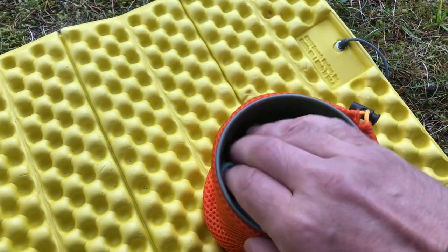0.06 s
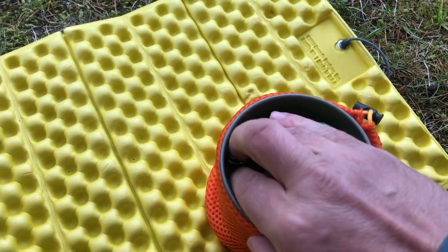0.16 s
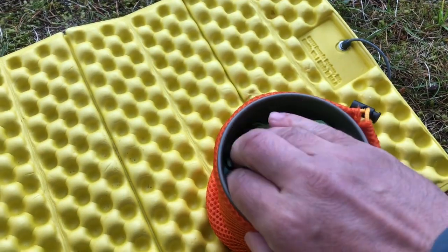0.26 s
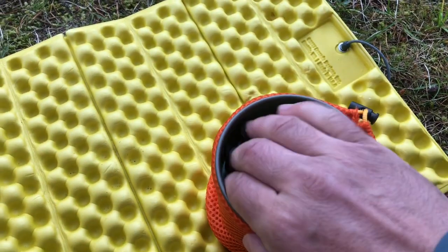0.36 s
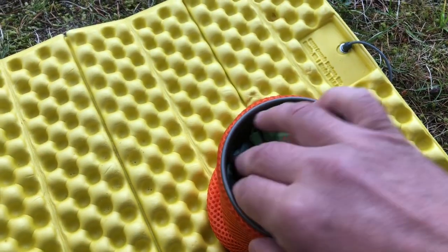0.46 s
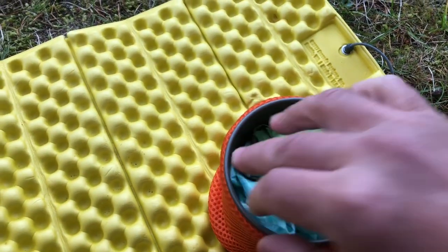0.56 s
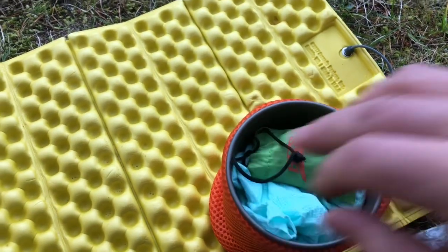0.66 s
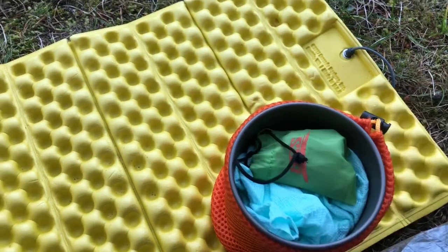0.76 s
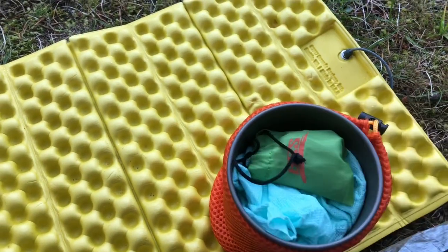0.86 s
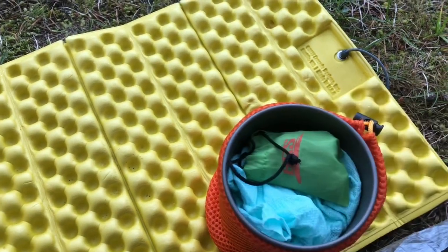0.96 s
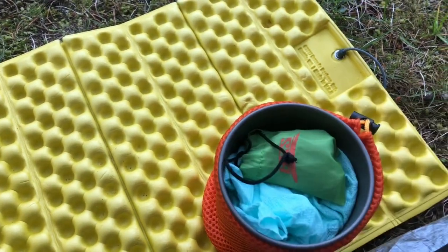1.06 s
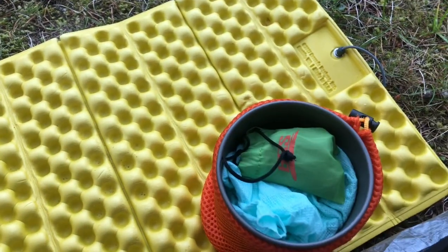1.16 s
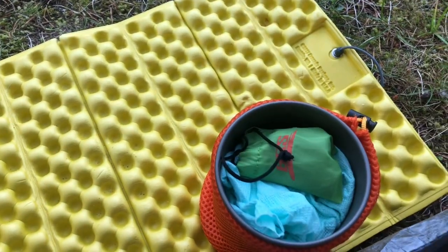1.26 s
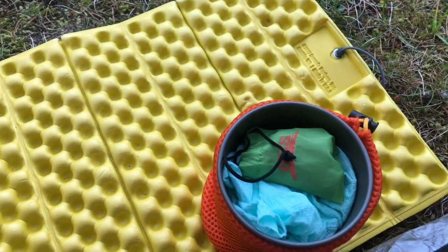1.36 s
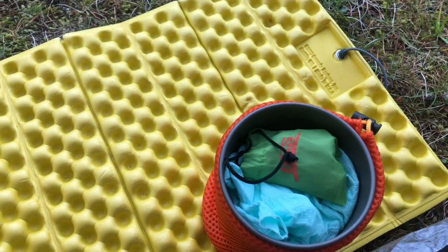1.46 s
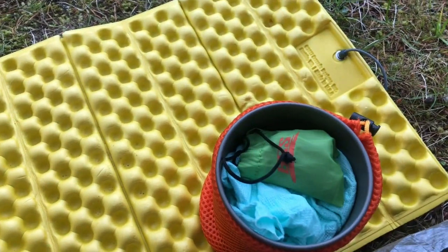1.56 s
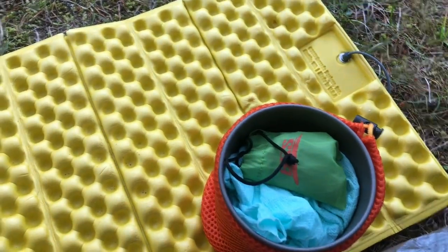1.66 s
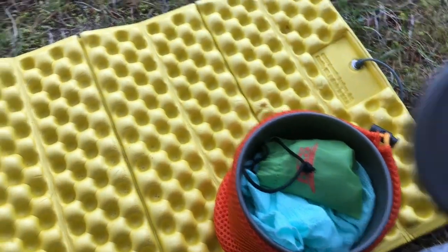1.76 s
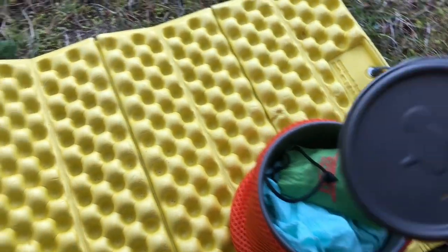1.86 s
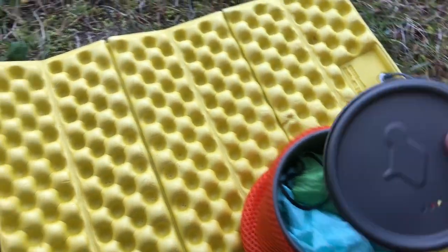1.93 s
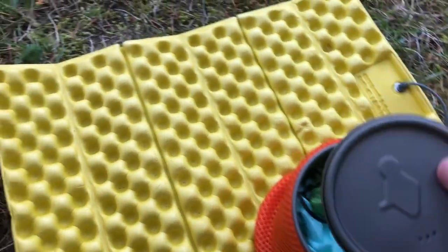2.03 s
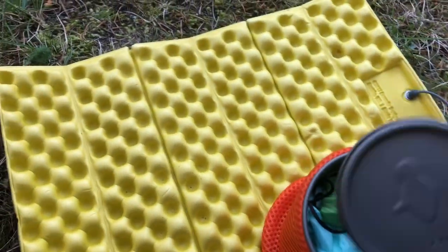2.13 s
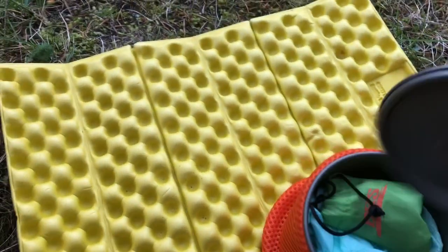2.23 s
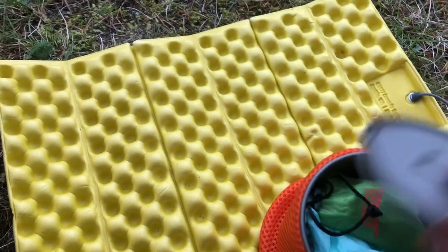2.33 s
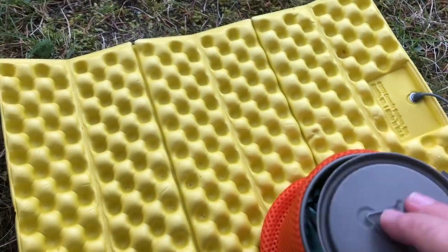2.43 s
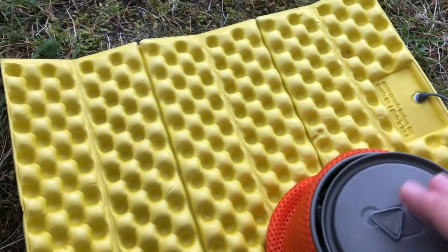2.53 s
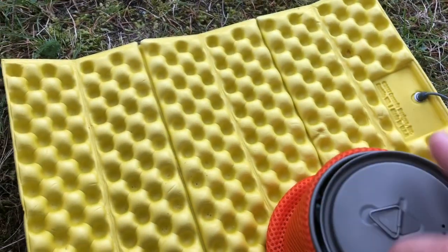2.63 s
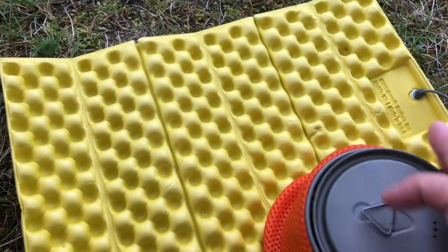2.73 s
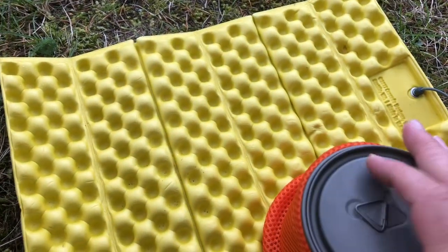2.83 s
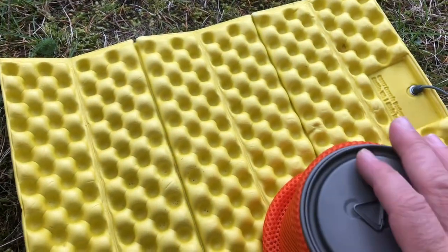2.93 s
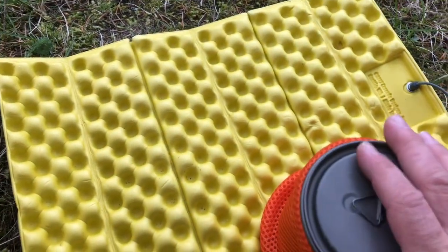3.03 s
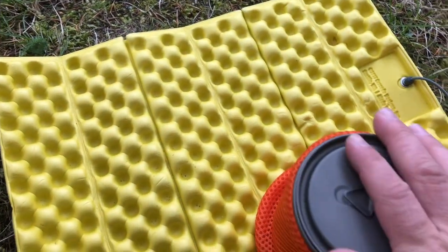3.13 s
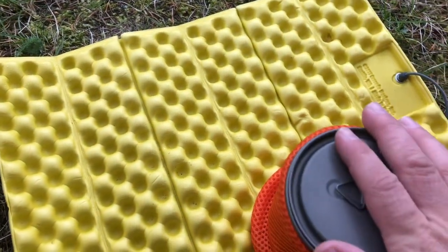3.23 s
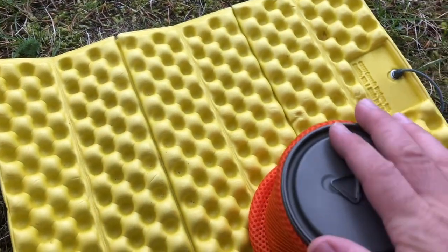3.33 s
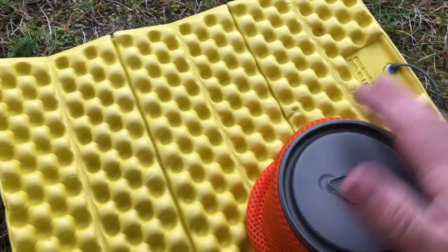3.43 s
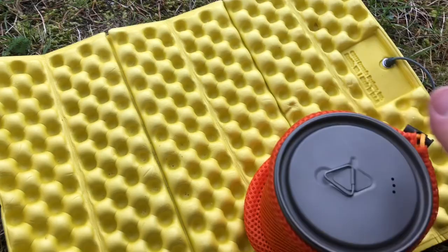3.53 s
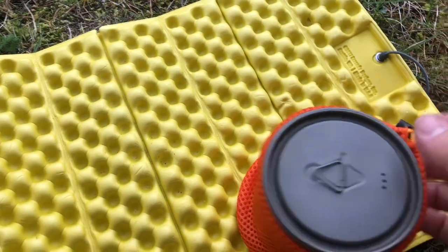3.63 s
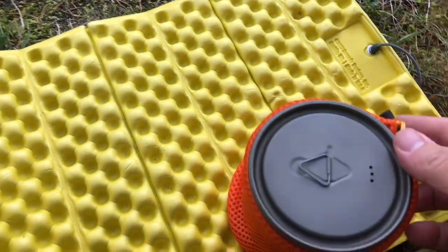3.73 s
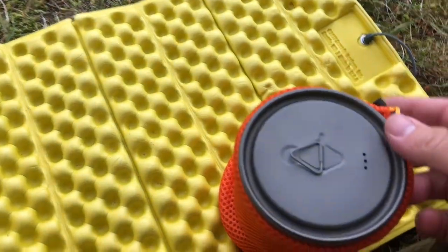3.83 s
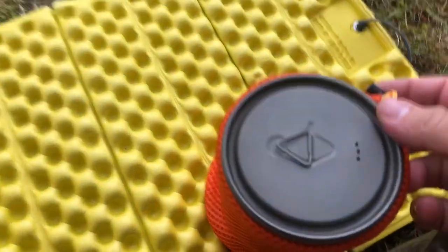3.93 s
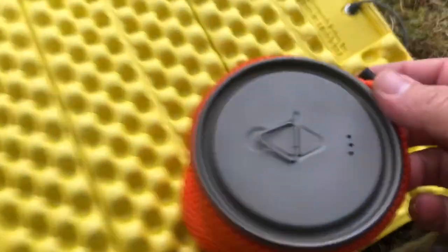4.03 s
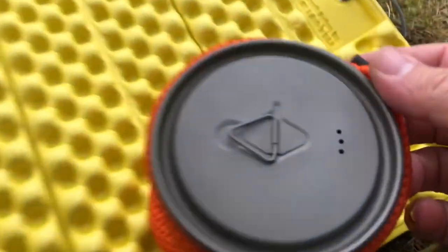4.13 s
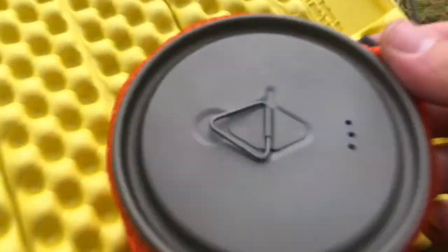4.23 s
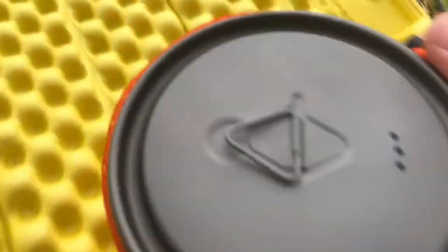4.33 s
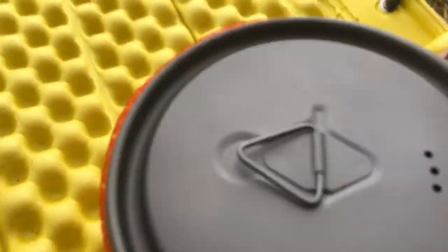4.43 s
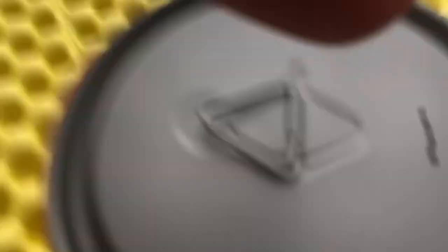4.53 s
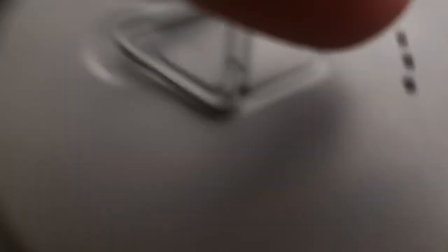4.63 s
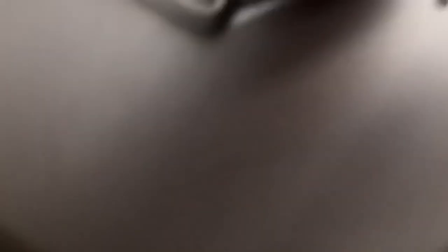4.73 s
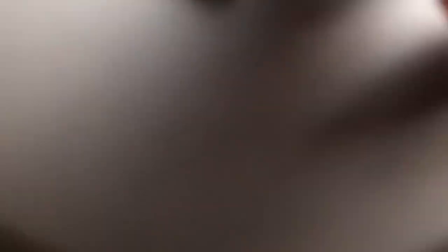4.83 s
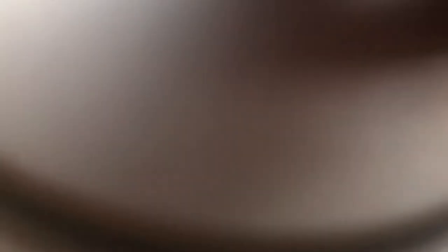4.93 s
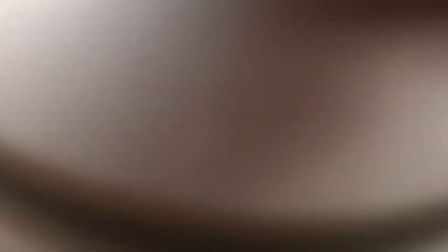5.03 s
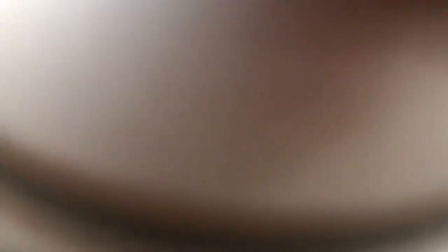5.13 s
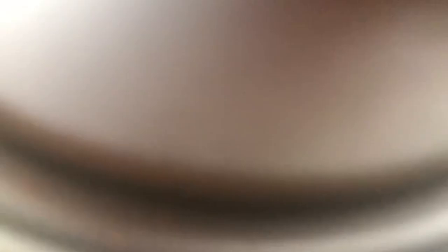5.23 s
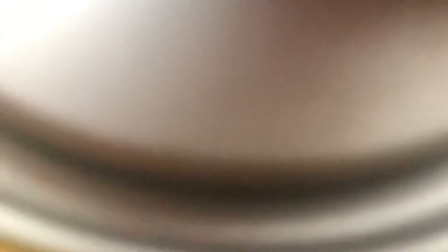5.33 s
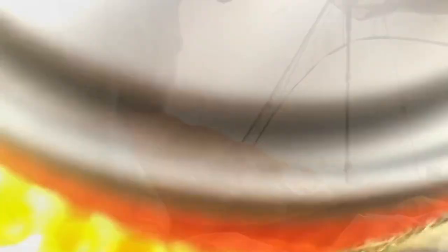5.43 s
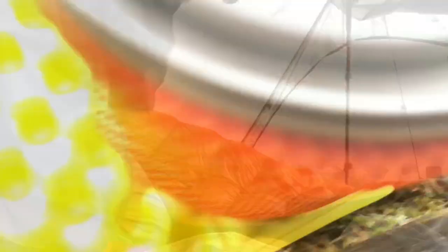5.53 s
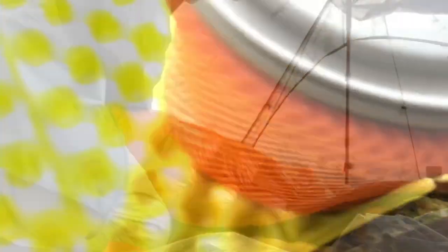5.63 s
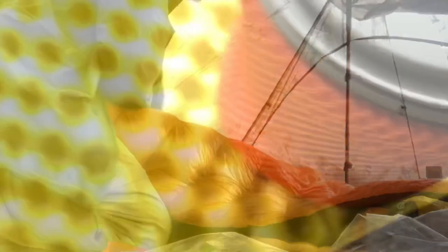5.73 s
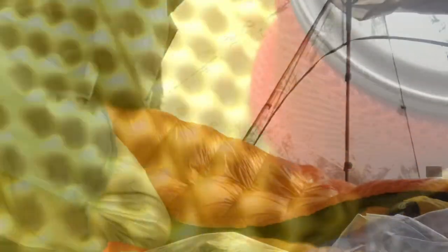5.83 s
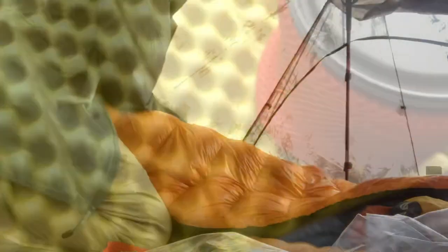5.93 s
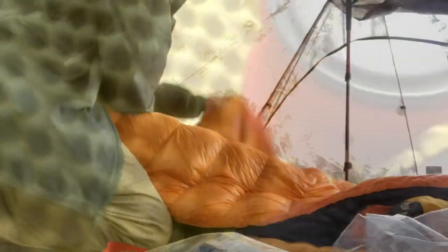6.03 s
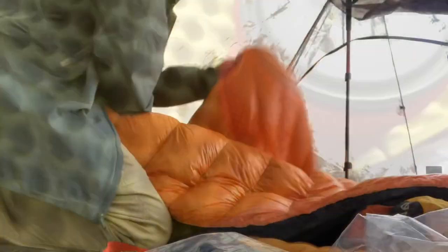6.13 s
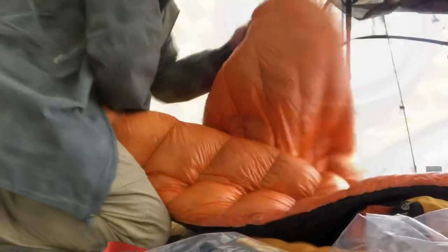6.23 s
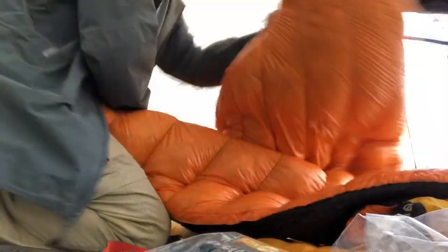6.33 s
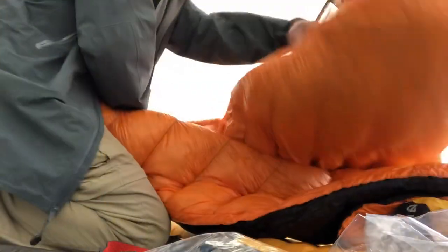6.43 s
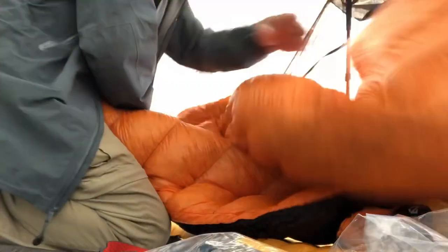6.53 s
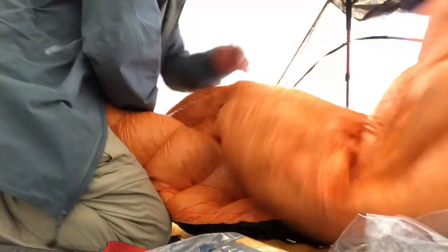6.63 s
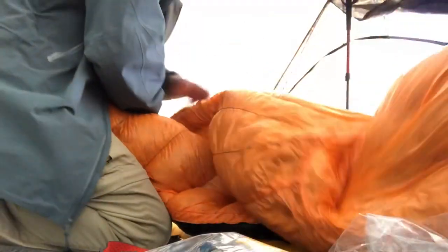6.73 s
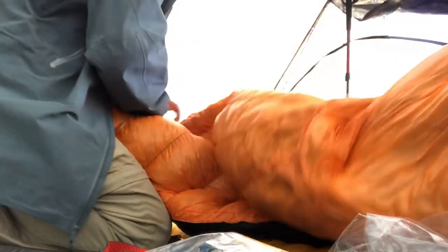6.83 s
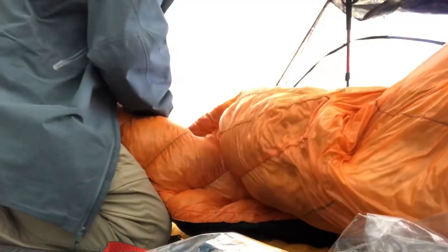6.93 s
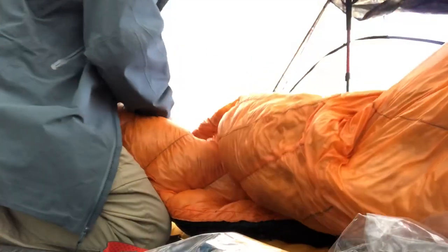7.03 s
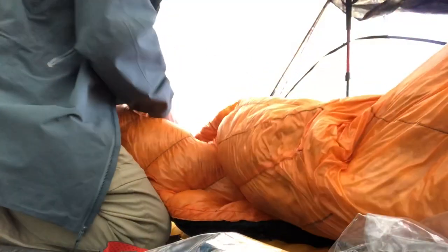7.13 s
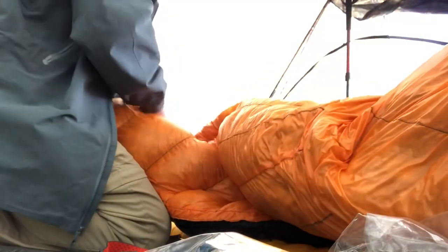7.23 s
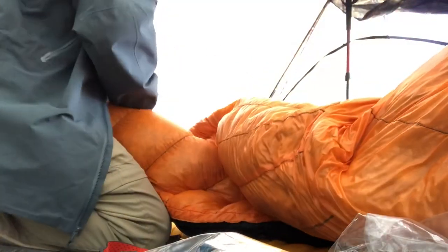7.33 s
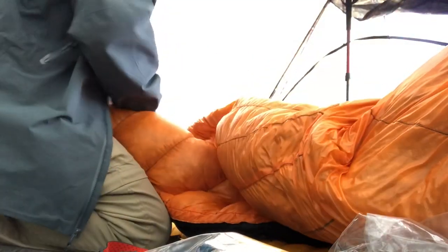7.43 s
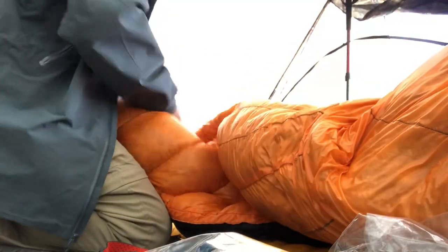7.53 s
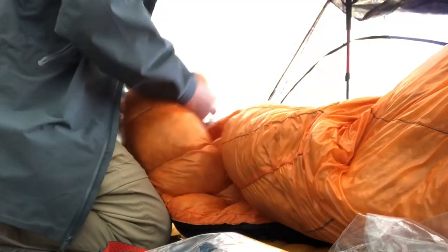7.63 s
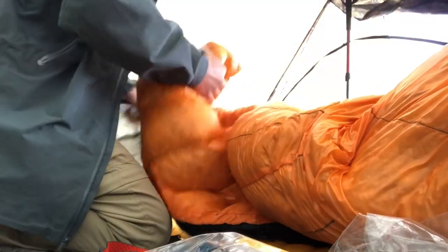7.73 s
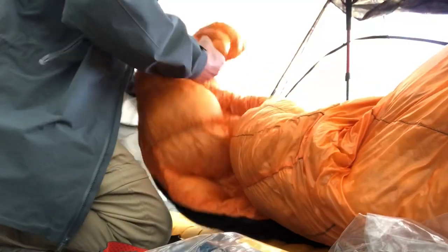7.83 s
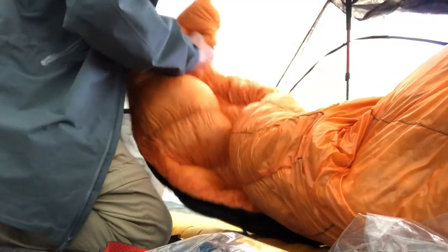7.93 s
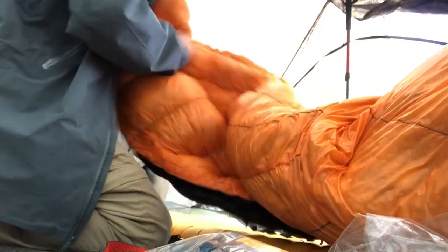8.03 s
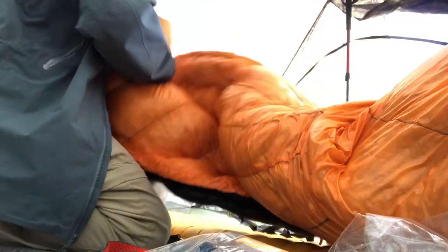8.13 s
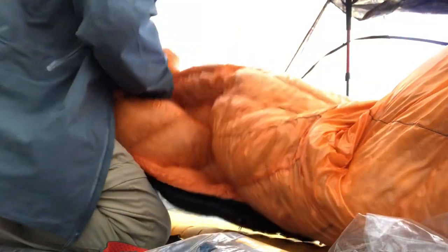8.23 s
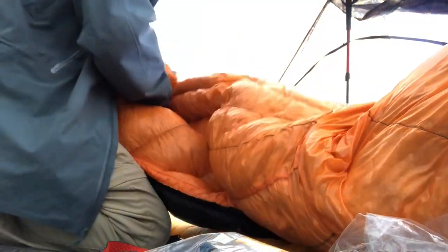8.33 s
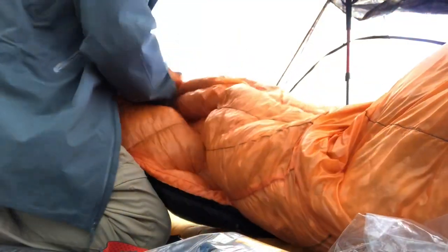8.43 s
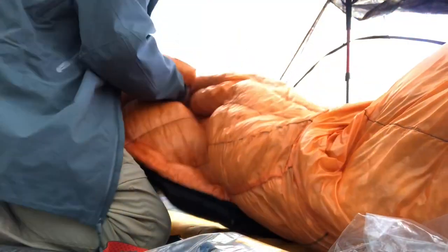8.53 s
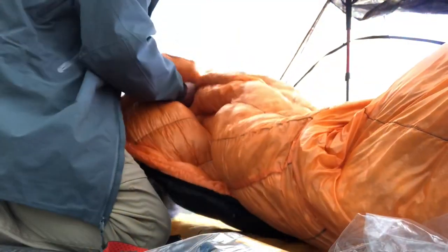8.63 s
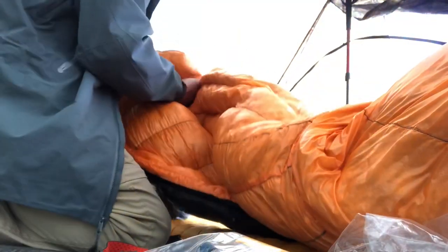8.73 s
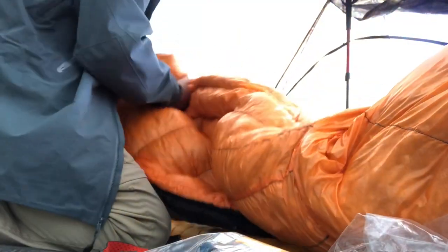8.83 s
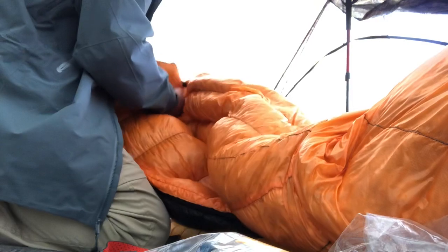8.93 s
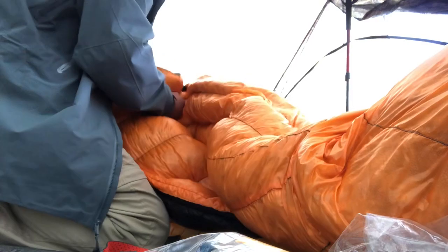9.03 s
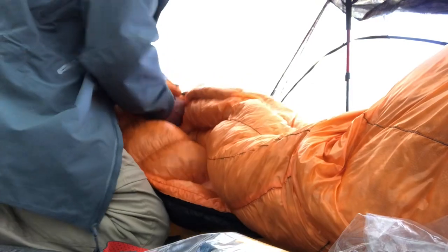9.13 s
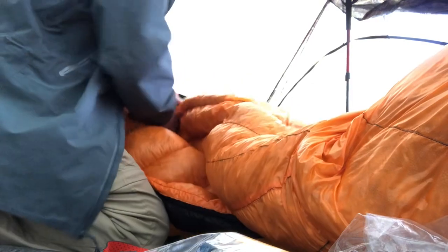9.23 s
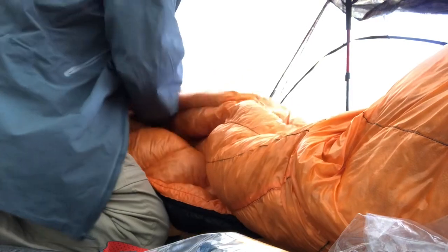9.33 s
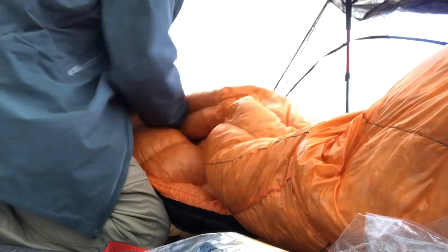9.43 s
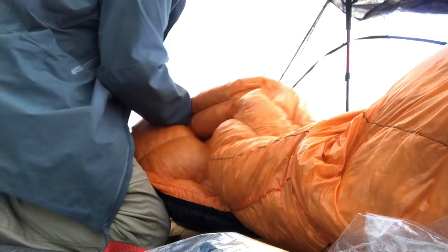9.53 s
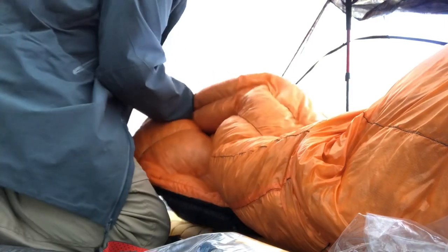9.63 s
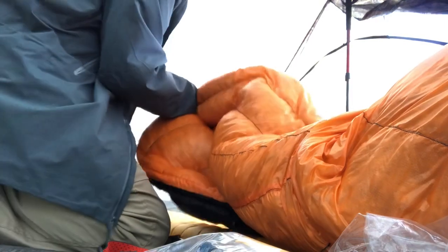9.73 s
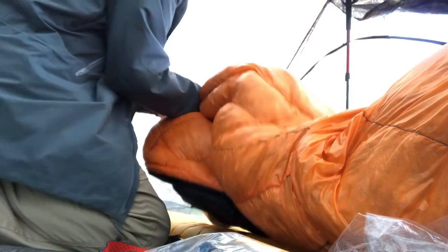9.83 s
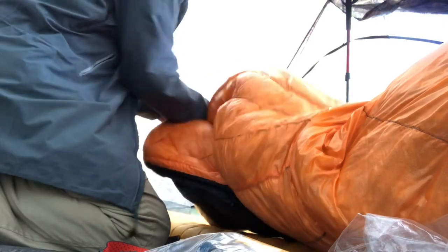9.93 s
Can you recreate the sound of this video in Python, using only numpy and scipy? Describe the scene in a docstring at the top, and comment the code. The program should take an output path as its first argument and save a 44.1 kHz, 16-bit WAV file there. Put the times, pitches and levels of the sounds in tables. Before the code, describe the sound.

Very close and dry outdoors, over a faint hush, hands rub soft bags into a thin metal pot. A lid drags off cloth, clinks onto the rim, scrapes round and snaps home while a distant bird whistles thinly. The pot is handled and knocks hard near the microphone. Then loose nylon quilt fabric swishes, billows and crumples steadily to the end.

```python
"""Outdoors, close to the microphone, over a faint steady hush: hands and a sleeve rub as filtered noise while
small bags are pressed into a thin metal pot on a foam mat. The lid drags off cloth; a far bird whistles in gliding tones.
The lid clinks on, scrapes round and snaps home: noise cracks, decaying modes and dense slips. The closed pot is
picked up and knocked very near, a swing falling in pitch. Then, inside a tent, a nylon quilt is pulled in and
stuffed away in swishing, billowing strokes of noise, with crumples and snapping folds."""
import sys
import numpy as np
from scipy import signal
from scipy.fft import rfft, irfft, next_fast_len
from scipy.io import wavfile

SR = 44100
rng = np.random.default_rng(int(sys.argv[2]) if len(sys.argv) > 2 else 0)


def unload_wav(signal):
    """Save mono or channel-first audio to the path in sys.argv[1] as 16-bit WAV at rate SR, clipped to [-1, 1]."""
    wavfile.write(
        sys.argv[1],
        SR,
        np.round(np.clip(np.atleast_2d(signal).T, -1, 1) * 32767).astype(np.int16),
    )


N = 439677
TIME = np.arange(N) / SR
AGE = np.arange(SR // 4) / SR   # time since a contact, s

# All event levels stand ahead of the final rounding in record(); t60_s is the time to fall 60 dB.

# Spectra, relative levels: pitch_hz, level_db (per Hz)
AIR_COLOUR = [(18, -30), (30, -7.5), (118, 0.5), (174, 3), (364, -6.5), (889, -7.5), (1010, -7.5),
              (2350, -9), (2980, -15.5), (6380, -16), (10500, -21.5), (14800, -18.5), (16000, -45)]
SLEEVE_COLOUR = [(100, -3), (250, -2), (700, -20), (1050, -1), (1500, -1), (2100, -3.5), (2800, -13),
                 (4300, -5), (9000, -15), (16000, -17)]
HANDLING_COLOUR = [(24, -49), (40, -23.5), (91, -3), (312, -6), (942, -13.5), (1630, -13), (3560, -17),
                   (6020, -17), (14800, -23), (16000, -19.5)]
DRAG_COLOUR = [(35, -50), (60, -4), (139, -11), (244, -7), (448, -13), (492, -15), (1440, -6), (2050, -1.5),
               (2840, -17.5), (3420, -2.5), (5720, -5), (16000, -17.5)]
QUILT_COLOUR = [(21, -27.5), (35, -23), (49, -8.5), (107, -2.5), (262, -3.5), (405, -8), (564, -10.5),
                (1070, -11), (1150, -12), (1380, -12), (2290, -15), (4560, -13.5), (15500, -24)]
CRUMPLE_COLOUR = [(240, -33), (400, 22.5), (1030, -13), (1650, 11), (3990, 3), (7750, -4), (16000, -44)]

# Far bird's notes: start_s, length_s, first_pitch_hz, middle_pitch_hz, last_pitch_hz, level_db
BIRD_NOTES = [(1.79, 0.21, 3710, 3670, 3700, -60), (1.927, .13, 2480, 2620, 2580, -64),
              (2.482, .088, 5900, 4520, 3600, -52), (2.638, .085, 3200, 3930, 3400, -53),
              (2.84, .072, 5950, 4650, 3800, -54), (2.978, .095, 3200, 3840, 3000, -58.5),
              (3.77, 0.16, 3270, 2900, 3050, -63)]
# Jacket sleeve passing as the arm moves: peak_s, rise_s, fall_s, level_db
SLEEVE_SWEEPS = [(.78, 0.88, 1, -54.5), (1.57, 0.2, 0.56, -53.5), (2.33, 0.35, 0.92, -52),
                 (3.45, 0.87, 0.61, -55.5)]

# Strokes over cloth: peak_s, rise_s, fall_s, swish_db (at usual brightness), billow_db (of the folds)
# Hands on the bags and the pot's mesh cover
HAND_STROKES = [(.045, 0.058, 0.079, -50.5, -71), (.26, 0.21, 0.043, -58, -84),
                (.47, 0.22, 0.022, -57.5, -83), (4.08, 0.39, 0.78, -55, -62), (4.68, 0.35, 0.17, -54, -52),
                (4.98, 0.44, 0.13, -53, -51.5), (5.36, 0.096, 0.044, -58, -52)]
# The lid dragged off its cloth in two pulls, then sliding free
DRAG_STROKES = [(.99, 0.017, 0.027, -44.5, -51), (1.095, 0.13, 0.086, -43, -47),
                (1.2, 0.057, 0.09, -36.5, -50.5), (1.255, 0.054, 0.035, -40, -51),
                (1.31, 0.091, 0.084, -45, -63), (1.46, 0.14, .45, -51.5, -72)]
# The quilt pulled and pushed
QUILT_STROKES = [(5.8, .3, 0.27, -54, -81), (6.33, 0.28, 0.17, -52.5, -60), (6.57, 0.23, 0.2, -54.5, -56.5),
                 (6.65, 0.078, 0.17, -54.5, -56), (7.57, 0.044, 0.053, -57, -47),
                 (7.78, 0.091, 0.037, -57, -47), (8.15, 0.48, 0.94, -56.5, -63),
                 (8.45, 0.52, 0.21, -57.5, -49.5), (8.82, 0.2, 0.13, -58, -54),
                 (9.29, 0.29, 0.092, -53.5, -46), (9.43, 0.23, 0.18, -49, -45.5),
                 (9.9, 0.35, 0.14, -47.5, -46.5)]
# Bunched nylon crumpling: peak_s, half_length_s, level_db
CRUMPLES = [(6.363, 0.057, -57), (6.624, 0.039, -54), (7.695, 0.071, -53.5), (7.774, 0.11, -54.5)]
# Single quilt folds snapping: start_s, level_db, centre_hz
FOLD_SNAPS = [(6.329, -42, 1600), (7.05, -46, 890), (7.103, -44, 886), (7.158, -46, 1700),
              (7.292, -46, 1400), (7.342, -47, 740), (8.347, -42, 1160)]

# Dull bumps of pot, mat and knee: start_s, level_db, settled_pitch_hz
THUDS = [(0.063, -44, 370), (0.896, -45.5, 206), (0.976, -46, 230), (1.037, -39.5, 181),
         (1.1321, -26.5, 324), (2.41, -27.5, 268), (2.728, -27.5, 274), (2.747, -34, 396), (2.93, -22, 187),
         (3.226, -28, 182), (3.599, -32.5, 260), (3.983, -33.5, 197), (4.273, -40.5, 175),
         (4.571, -40.5, 200), (4.643, -20.5, 177), (4.815, -29.5, 222), (4.992, -24.5, 212.5),
         (5.356, -37, 220), (5.764, -40, 455), (6.562, -40, 233), (7.409, -41, 340), (9.905, -25.5, 186)]
# Dry ticks of fingers, cord and toggle, and the sharp onset of the pot's hard knock:
# start_s, level_db (before the trim in ticks()), centre_hz, treble_db (re clack)
TICKS = [(0.184, -46, 3000, -14), (0.383, -41, 840, -8), (1.089, -23.5, 3530, -2.5),
         (1.129, -25, 1010, -17), (2.047, -40.5, 1720, -29), (3.069, -38, 2110, 4.5),
         (3.984, -27.5, 800, -6), (4.001, -35, 1090, -14), (4.062, -36, 1340, -18), (4.084, -37, 1740, -16),
         (4.199, -37.5, 1400, -20), (4.274, -36.5, 900, -18), (4.713, -35, 1630, -19),
         (4.85, -31, 570, -18), (4.918, -35, 1490, -1), (4.938, -34, 1540, -2), (4.981, -27, 835, -2),
         (5.0144, -10.5, 2030, 0.5), (5.215, -41.5, 720, -14)]
# Tiny stick-slip squeaks: start_s, length_s, first_pitch_hz, last_pitch_hz, level_db
SQUEAKS = [(1.318, 0.0234, 1524, 1860, -43.5), (5.011, 0.0084, 3250, 3020, -42)]
# Rasps of lid and pot, the lid scraping round and later brief bright rubs as the pot is handled:
# peak_s, rise_s, fall_s, level_db, treble_db (re hollow part)
RASPS = [(2.468, 0.02, 0.019, -39.5, -9), (2.61, 0.041, 0.023, -38, -11.5), (2.696, 0.011, 0.03, -30, -6.5),
         (2.72, 0.021, .04, -34.5, -8), (2.926, .012, 0.0026, -20.5, 0.5), (3.259, 0.01, 0.0051, -35, -2.5),
         (3.332, 0.032, 0.016, -44, -5), (3.615, 0.016, 0.017, -40.5, -11),
         (3.705, 0.028, .021, -54.5, -10), (4.638, 0.0036, 0.011, -32, -3), (4.994, 0.018, 0.019, -39, -2),
         (5.16, 0.025, 0.011, -59.5, 14), (5.372, .025, 0.06, -49, 9)]
# Modes of the loose lid: pitch_hz, level_db (relative), t60_s
LID_MODES = [(832, -14, .1), (1457, -8, .12), (2060, -14, .13), (2159, -5, .12), (2572, -9, .3),
             (3668, -3, .085), (4240, -16, .16), (4745, -7, .07), (4860, 1, .09), (5284, -10, .08),
             (5940, -4, .08), (6490, -12, .11), (7101, -5, .087), (7335, -13, .09), (7757, -13, .075),
             (8672, -11, .07), (8845, -11, .08), (12140, -12, .06), (15370, -11, .06)]
# Modes of the closed pot: pitch_hz, level_db (relative), t60_s
POT_MODES = [(840, -19, .35), (1290, -4, .018), (1530, -11, .035), (1920, -8, .025), (2150, -3, .09),
             (2565, -3, .14), (2650, -4, .065), (3370, -13, .05), (4670, -7, .045), (4850, -9, .05),
             (5315, -12, .06), (5962, -9, .06), (6480, -11, .06), (7150, -11, .05), (7720, -9, .045),
             (10370, -14, .04), (11770, -13, .04), (12130, -13, .045), (13380, -12, .03)]
# Lid meeting rim: start_s, level_db, crack_centre_hz, treble_db, crack_t60_s, ring_db (both re clack),
# free_s (until the rim damps the ring)
LID_HITS = [(2.333, -14.5, 2595, 2, 0.028, -1, 0.02), (2.4082, -13.5, 1530, 2, 0.021, -13, 0.0073),
            (2.726, -29, 1500, 3.5, 0.011, -8, .019)]
# Clicks on the closed pot: start_s, level_db, crack_centre_hz, treble_db, crack_t60_s, ring_db (both re clack),
# grip_t60_s (damping by the hand), favoured_hz (mode favoured by the spot)
POT_HITS = [(2.929, -6.5, 2950, -8, 0.011, -15.5, 0.2, 5962),
            (3.224, -30.5, 1400, -13, 0.012, -5, 0.052, 2150), (3.355, -38, 1260, -26, 0.016, -5.5, 1, 840),
            (3.584, -35.5, 2300, 1, 0.015, 1, 1, 840), (3.597, -34.5, 1900, 2.5, 0.02, 1.5, 1, 2650),
            (4.639, -27, 1900, 0, 0.018, 4, 0.065, 4780),
            (5.0163, -10.5, 1265, 2.5, 0.013, -7, 0.044, 2565),
            (5.029, -21, 1480, 2, .014, -2.5, 0.22, 2150), (5.058, -31, 1060, -2.5, .019, -7, 0.092, 2150)]


def from_db(db):
    """Decibels to gain."""
    return 10 ** (np.asarray(db) / 20)


def rms_one(x):
    """Scale to unit power."""
    return x / np.sqrt(np.mean(x ** 2) + 1e-20)


def add(out, start_s, sound):
    """Mix a short sound in at its start time."""
    at = max(round(start_s * SR), 0)
    out[at:at + len(sound)] += sound[:max(N - at, 0)]


def passed(x, hz, kind, order=2):
    """Butterworth filter."""
    edges_hz = np.clip(hz, 10, .45 * SR)
    return signal.sosfilt(signal.butter(order, edges_hz, kind, fs=SR, output="sos"), x)


def drift(rate_hz):
    """Smooth random wandering of rms 1, with a new target rate_hz times a second."""
    targets = rng.standard_normal(N // 8)
    return rms_one(np.interp(TIME * rate_hz, np.arange(N // 8), targets))


def coloured(x, colour, low_hz=10, high_hz=SR):
    """Shape a spectrum between two soft edges; rms 1."""
    size = next_fast_len(N)
    hz = np.arange(size // 2 + 1) * SR / size + 1   # offset avoids the log of zero
    points_hz, points_db = np.transpose(colour)
    shape = from_db(np.interp(np.log(hz), np.log(points_hz), points_db))
    edges = 1 / np.sqrt((1 + (low_hz / hz) ** 6) * (1 + (hz / high_hz) ** 6))
    return rms_one(irfft(rfft(x, size) * edges * shape, size)[:N])


def burst(hz, t60, order=1):
    """Crowded modes in a band die together: fading noise that starts near rms 1."""
    fade = from_db(-60 * AGE / max(t60, .002))
    noise = passed(rng.standard_normal(len(AGE)) * fade, hz, "band", order)
    return rms_one(noise) * np.sqrt(np.mean(fade ** 2))


def crack(hz, treble_db, t60, spread=1.77):
    """The instant of contact: a clack round its centre, a bright edge and a little hollow body."""
    clack = burst([hz / spread, hz * spread], t60, order=2)
    edge = from_db(treble_db) * burst((4200, 15500), t60, order=2)
    body = from_db(-11) * burst((650, 2600), t60, order=2)
    return clack + edge + body


def ringing(modes, favoured_hz=None, favour_db=9, favour_octaves=0.12):
    """Struck modes whose strengths vary with the spot, which may favour one; starts at rms 1."""
    hz, db, t60 = np.transpose(modes)[:, :, None]
    if favoured_hz:
        db = db + favour_db * np.exp(-(np.log2(hz / favoured_hz) / favour_octaves) ** 2)
    gain = from_db(db + 2 * rng.standard_normal(db.shape)) * rng.choice([-1, 1], db.shape)
    tones = gain * np.sin(2 * np.pi * hz * AGE) * from_db(-60 * AGE / t60)
    return tones.sum(0) / np.sqrt(np.sum(gain ** 2) / 2)


def bend(hz, cycles, lead, lead_s):
    """A struck wall swings, dying in a few cycles; higher bending waves arrive first, so the pitch drops."""
    pitch_hz = hz * (1 + lead * np.exp(-AGE / lead_s))
    fade = from_db(-60 * AGE * hz / cycles)   # cycles of the settled pitch per 60 dB
    return np.sin(2 * np.pi * np.cumsum(pitch_hz) / SR) * fade


def rubbed(modes, rise_s, fall_s, dry_db, grip_t60):
    """A rub on metal: a dense run of tiny slips sets modes ringing; about rms 1 at its peak."""
    force = np.interp(AGE, [0, rise_s, rise_s + fall_s], [0, 1, 0])
    grit = from_db(3 * drift(700)[:len(AGE)])
    slips = force * rng.standard_normal(len(AGE)) * grit
    damped_ring = ringing(modes) * from_db(-60 * AGE / grip_t60)
    body = signal.fftconvolve(slips, damped_ring)[:len(AGE)]
    dry_rub = passed(slips, (800, 7500), "band", order=1)
    sound = rms_one(body) + from_db(dry_db) * rms_one(dry_rub)
    return rms_one(sound) * np.sqrt(np.mean(force ** 2))


def swell(peak_s, rise_s, fall_s):
    """Speed of one stroke: it eases up to 1 at its peak and back to rest."""
    ramp = np.interp(TIME, [peak_s - rise_s, peak_s, peak_s + fall_s], [0, 1, 0])
    return np.sin(np.pi / 2 * ramp) ** 2


def strokes(rows):
    """Summed power of swish and billow over strokes that speed up and slow down smoothly."""
    power = 0
    for peak_s, rise_s, fall_s, swish_db, billow_db in rows:
        power = power + (from_db([[swish_db], [billow_db]]) * swell(peak_s, rise_s, fall_s)) ** 2
    return power


def creases(per_s, size_db):
    """Random pops of buckling fabric with exponentially spread sizes in dB; rms 1."""
    sizes = from_db(size_db * np.minimum(rng.exponential(1, N), 4)) * rng.choice([-1, 1], N)
    return rms_one(sizes * (rng.random(N) < per_s / SR))


def cloth(power, colour, usual_db, flap_db, catch_db, creases_per_s, crease_db, size_db, brighten, snap_db):
    """Folds billow air and snap over; the weave catches and lets go in a swish, brighter when it slides fast."""
    swish, billow = np.sqrt(power)
    catching = from_db(catch_db * rms_one(drift(45) + drift(260)))
    pops = creases(creases_per_s * catching, size_db)
    weave = rng.standard_normal(N) * catching + from_db(crease_db) * pops
    rub = coloured(weave, colour, low_hz=590)
    dull = passed(rub, 3800, "low", order=1)
    # the treble grows as a power of speed, relative to the usual swish level
    speed = swish / from_db(usual_db)
    rubbing = dull + speed ** brighten * (rub - dull)
    flapping = rng.standard_normal(N) * from_db(flap_db * drift(60))
    folds = coloured(flapping, colour, high_hz=554)
    snaps = rms_one(passed(creases(75, size_db=3), (300, 2200), "band", order=1))
    return billow * (folds + from_db(snap_db) * snaps) + swish * rubbing


def air(level_db=-63.0):
    """A faint, steady outdoor hush of coloured noise."""
    return from_db(level_db) * coloured(rng.standard_normal(N), AIR_COLOUR)


def among_trees(x, t60=0.27, direct=0.82, scattered=0.53):
    """A far sound arrives blurred by many faint echoes."""
    echoes = rng.standard_normal(len(AGE)) * from_db(-60 * AGE / t60)
    return direct * x + scattered * signal.fftconvolve(x, echoes / np.linalg.norm(echoes))[:N]


def bird(waver=0.0037):
    """Thin, slightly wavering whistles glide through three pitches."""
    out = np.zeros(N)
    for start_s, length_s, first_hz, middle_hz, last_hz, db in BIRD_NOTES:
        along = np.linspace(0, 1, int(length_s * SR))
        glide = np.polyfit([0, .5, 1], [first_hz, middle_hz, last_hz], 2)
        hz = np.polyval(glide, along) * (1 + waver * drift(400)[:len(along)])
        loudness = from_db(db) * np.sqrt(np.abs(np.sin(np.pi * along)))
        add(out, start_s, loudness * np.sin(2 * np.pi * np.cumsum(hz) / SR))
    return out


def sleeve(catch_db=2.0):
    """Smooth jacket cloth hisses softly with each sweep of the arm."""
    speed = sum(from_db(db) * swell(peak_s, rise_s, fall_s) for peak_s, rise_s, fall_s, db in SLEEVE_SWEEPS)
    hiss = rng.standard_normal(N) * from_db(catch_db * drift(60))
    return speed * coloured(hiss, SLEEVE_COLOUR, low_hz=90)


def hands():
    """Hands press the bags in and later take the pot by its mesh cover, rubbing and billowing the cloth."""
    return cloth(strokes(HAND_STROKES), HANDLING_COLOUR, usual_db=-56.5, flap_db=4.5, catch_db=1.5,
                 creases_per_s=220, crease_db=-4.0, size_db=2.0, brighten=0.6, snap_db=-6.5)


def drag():
    """The lid slides over cloth, whose weave rubs and folds move."""
    return cloth(strokes(DRAG_STROKES), DRAG_COLOUR, usual_db=-32, flap_db=3.0, catch_db=2.0,
                 creases_per_s=710, crease_db=-27, size_db=-1.0, brighten=0.035, snap_db=-4)


def quilt(start_s=4.88, fade_in_s=1.83, swish_db=-60, billow_db=-54.5):
    """Strokes ride on a steady stirring of the loose nylon, which never quite rests between them."""
    stirring = np.clip((TIME - start_s) / fade_in_s, 0, 1) * from_db([[swish_db], [billow_db]])
    return cloth(strokes(QUILT_STROKES) + stirring ** 2, QUILT_COLOUR, usual_db=-52.5, flap_db=2.5,
                 catch_db=1.5, creases_per_s=600, crease_db=-12.5, size_db=3.5, brighten=.3, snap_db=-13.5)


def crumples(per_s=300, size_db=-0.5):
    """A gripped bunch of fabric crackles in random pops."""
    grip = sum(from_db(db) * np.maximum(1 - np.abs(TIME - peak_s) / half_s, 0) for peak_s, half_s, db in CRUMPLES)
    return grip * coloured(creases(per_s, size_db), CRUMPLE_COLOUR)


def fold_snaps(treble_db=-16, t60=0.0088):
    """A taut fold of nylon pops over."""
    out = np.zeros(N)
    for start_s, db, hz in FOLD_SNAPS:
        add(out, start_s, from_db(db) * crack(hz, treble_db, t60, spread=1.33))
    return out


def thuds(give_db=-10, give_hz=(85, 550), give_t60=0.069):
    """Soft bumps swing briefly, with the padding giving way under them."""
    out = np.zeros(N)
    for start_s, db, hz in THUDS:
        swing = bend(hz, cycles=8, lead=2.47, lead_s=0.0014)
        padding = from_db(give_db) * burst(give_hz, give_t60, order=2)
        add(out, start_s, from_db(db) * (swing + padding))
    return passed(out, 41, "high")


def ticks(trim_db=-3, t60=0.011):
    """Dry ticks of fingers, cord and toggle, and the sharp onset of the pot's hard knock: cracks with no ring."""
    out = np.zeros(N)
    for start_s, db, hz, treble_db in TICKS:
        add(out, start_s, from_db(db + trim_db) * crack(hz, treble_db, t60, spread=1.56))
    return out


def squeak(octave_db=-5, waver=0.028):
    """A sliding edge sticks and slips for a moment: a wavering tone and its octave."""
    out = np.zeros(N)
    for start_s, length_s, first_hz, last_hz, db in SQUEAKS:
        along = np.linspace(0, 1, int(length_s * SR))
        hz = (first_hz + (last_hz - first_hz) * along) * (1 + waver * drift(900)[:len(along)])
        phase = 2 * np.pi * np.cumsum(hz) / SR
        tone = np.sin(phase) + from_db(octave_db) * np.sin(2 * phase)
        add(out, start_s, from_db(db) * np.sin(np.pi * along) * tone)
    return out


def rasps(hollow_below_hz=2800, edge_above_hz=4000):
    """The lid scrapes round, and later the handled pot is briefly rubbed: a hollow rasp with a bright edge."""
    out = np.zeros(N)
    for peak_s, rise_s, fall_s, db, treble_db in RASPS:
        sound = rubbed(POT_MODES, rise_s, fall_s, dry_db=0.5, grip_t60=.15)
        hollow = rms_one(passed(sound, hollow_below_hz, "low", order=5))
        edge = rms_one(passed(sound, edge_above_hz, "high", order=3))
        rasp = rms_one(hollow + from_db(treble_db) * edge)
        add(out, peak_s - rise_s, from_db(db) * np.std(sound) * rasp)
    return out


def lid_buzz(peak_s=2.351, rise_s=0.012, fall_s=0.028, db=-17.0):
    """Just after landing, the ringing lid buzzes against the rim."""
    out = np.zeros(N)
    add(out, peak_s - rise_s, from_db(db) * rubbed(LID_MODES, rise_s, fall_s, dry_db=-4, grip_t60=.07))
    return out


def lid_hits(damped_t60=0.08):
    """The lid cracks onto the rim and rings freely until it lies there damped."""
    out = np.zeros(N)
    for start_s, db, hz, treble_db, t60, ring_db, free_s in LID_HITS:
        damping = from_db(-60 * np.maximum(AGE - free_s, 0) / damped_t60)
        ring = from_db(ring_db) * ringing(LID_MODES) * damping
        add(out, start_s, from_db(db) * (crack(hz, treble_db, t60) + ring))
    return out


def pot_hits():
    """Hard knocks leave a ring in the closed pot, which a gripping hand cuts short."""
    out = np.zeros(N)
    for start_s, db, hz, treble_db, t60, ring_db, grip_t60, favoured_hz in POT_HITS:
        ring = ringing(POT_MODES, favoured_hz) * from_db(ring_db - 60 * AGE / grip_t60)
        add(out, start_s, from_db(db) * (crack(hz, treble_db, t60) + ring))
    return out


def knock(start_s=5.0141, db=-2, hz=570):
    """The closed pot bumps something hard, very near: a short swing that falls in pitch."""
    out = np.zeros(N)
    add(out, start_s, from_db(db) * bend(hz, cycles=8.4, lead=2.73, lead_s=0.00139))
    return out


def scene():
    """The gear is close and dry, as grass and tent cloth return no echo; only the far bird is blurred."""
    background = air() + among_trees(bird())
    fabric = sleeve() + hands() + drag() + quilt() + crumples() + fold_snaps()
    contacts = thuds() + ticks() + squeak()
    pot = rasps() + lid_buzz() + lid_hits() + pot_hits() + knock()
    return (background + fabric + contacts + pot)[None]


def record(dry):
    """The microphone signal has its highest peaks rounded and its top cut above 16 kHz."""
    rounded = .96 * np.tanh(dry / .84)   # quiet sounds gain about 1.2 dB
    return signal.sosfilt(signal.ellip(10, .1, 80, 16000, fs=SR, output="sos"), rounded)


dry = scene()
out = record(dry)
unload_wav(out)
```